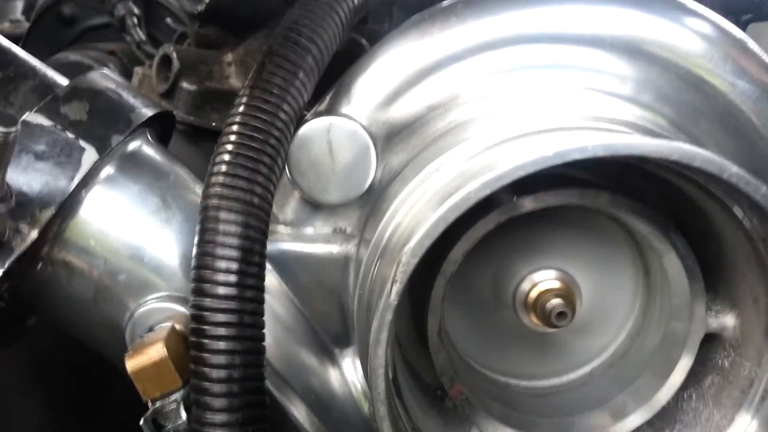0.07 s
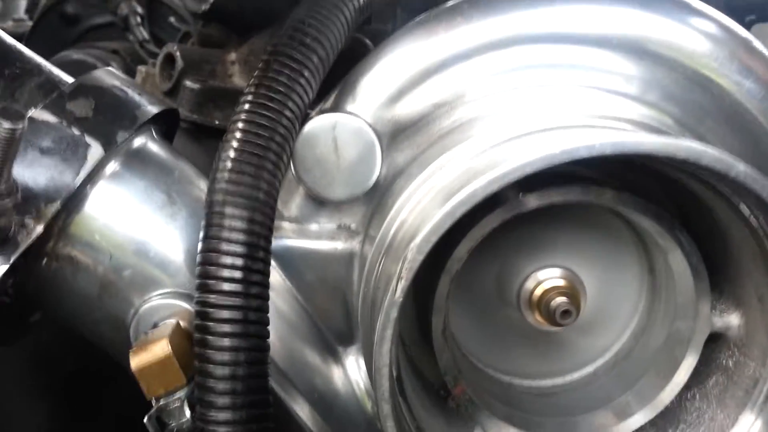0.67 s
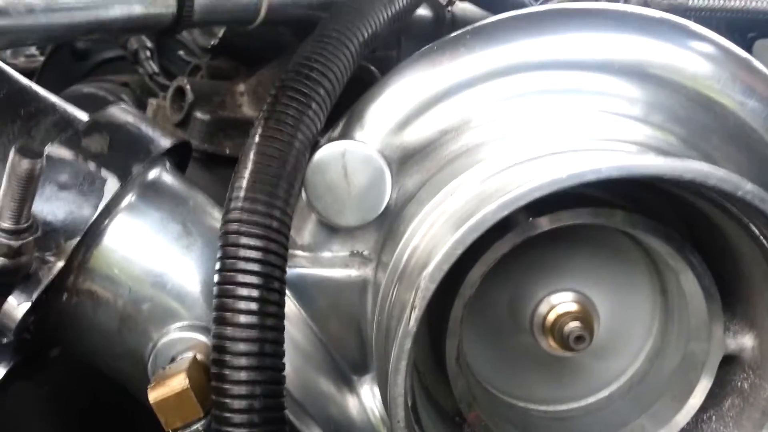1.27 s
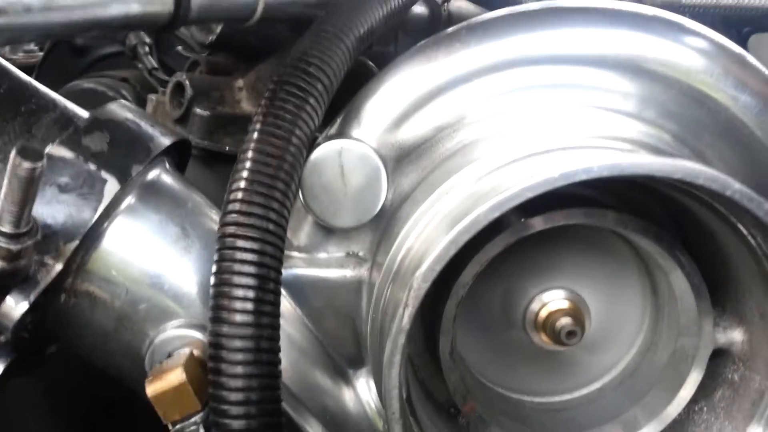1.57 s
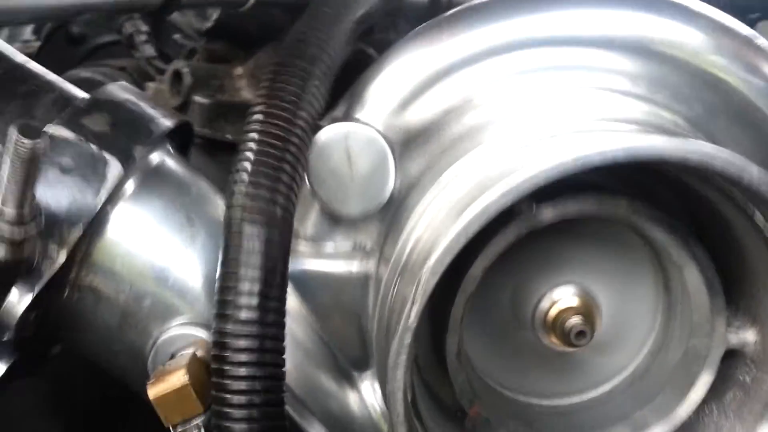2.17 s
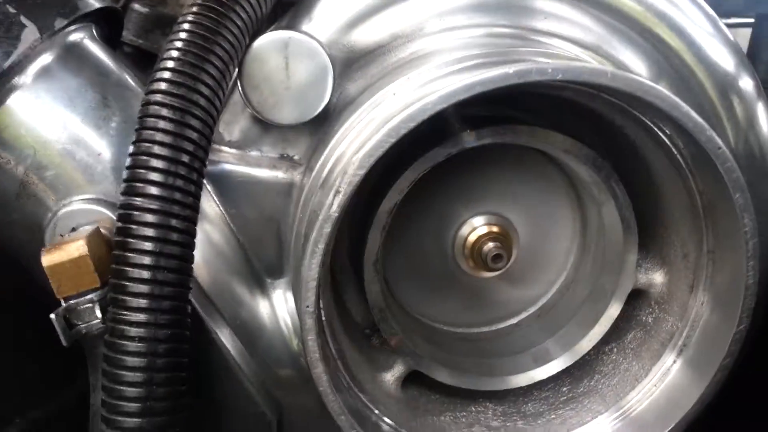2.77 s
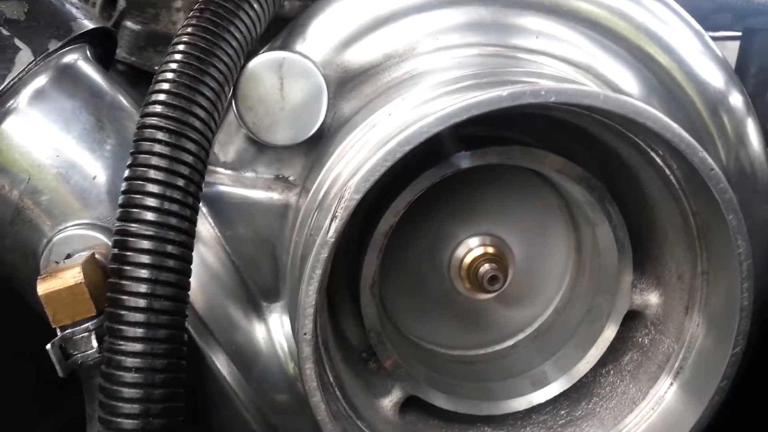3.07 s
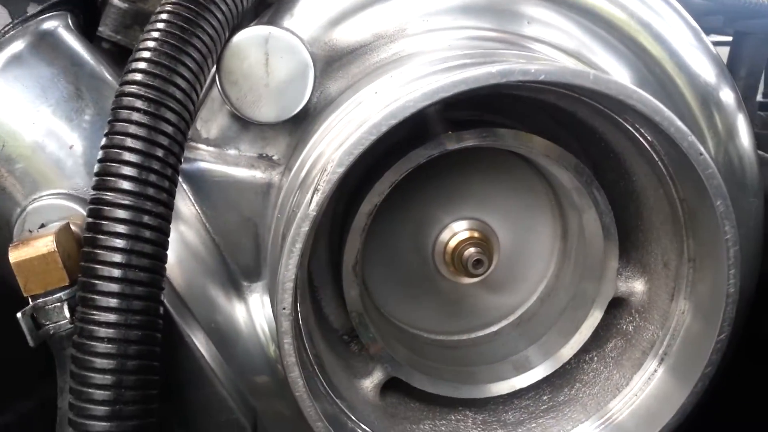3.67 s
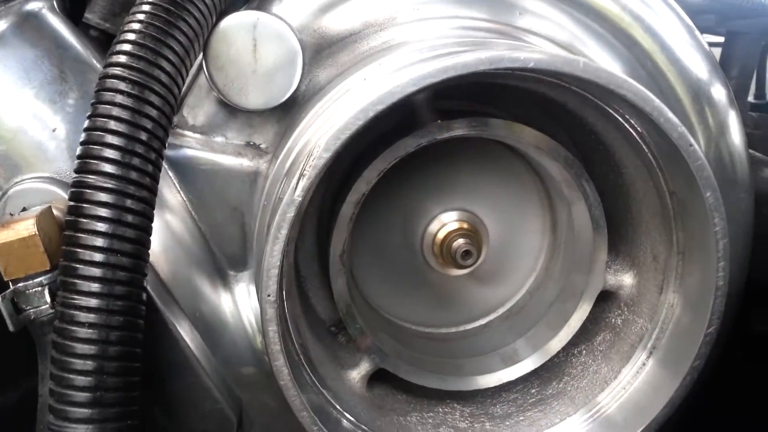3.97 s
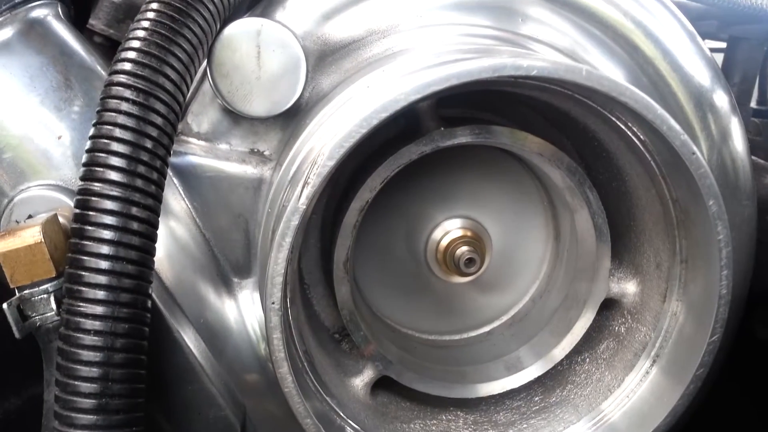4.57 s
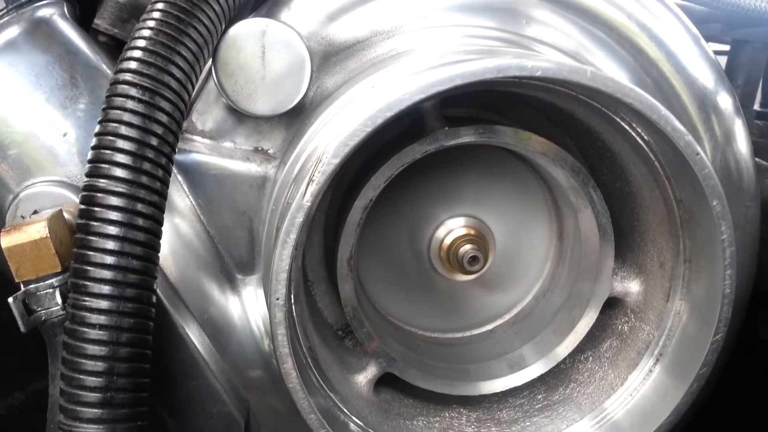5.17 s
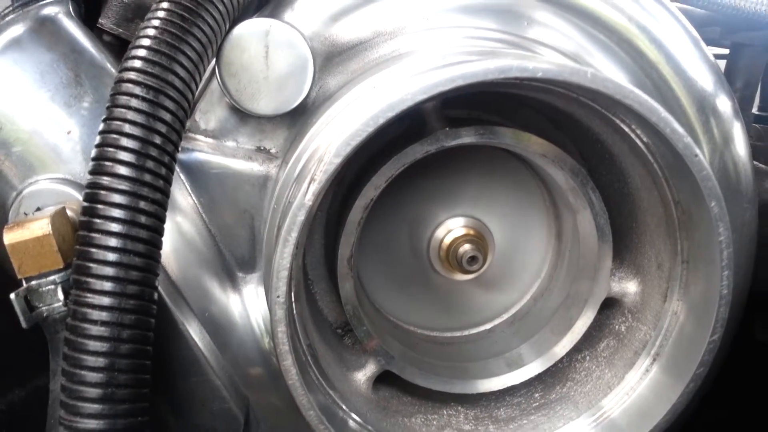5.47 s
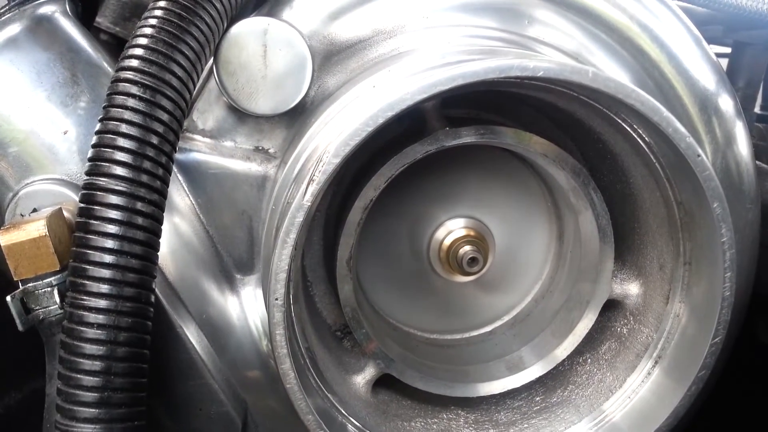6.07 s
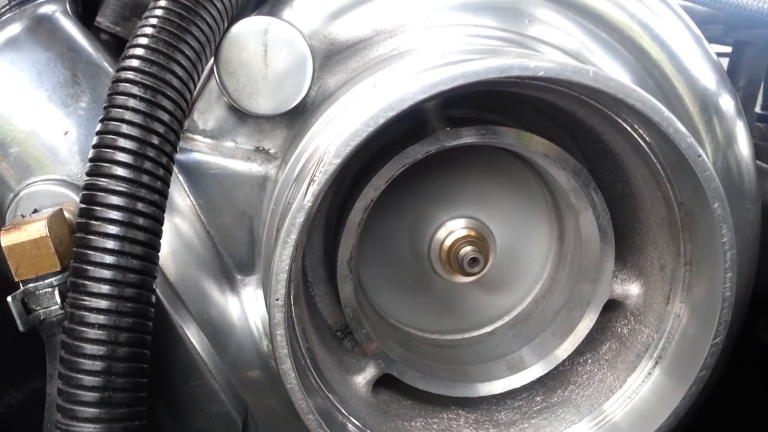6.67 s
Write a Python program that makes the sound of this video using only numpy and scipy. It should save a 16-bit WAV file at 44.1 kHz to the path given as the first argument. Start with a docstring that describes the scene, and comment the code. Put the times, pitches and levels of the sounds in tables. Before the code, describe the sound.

Close to an open turbocharger inlet, a knocking diesel engine stops, chuffs three times, and the wheel spins down with a pulsing hiss.

```python
"""A six-cylinder diesel idles, heard at its turbocharger's open inlet; each firing rings the block.
At 1.8 s the fuel is cut: the knocks slow and die, the inlet hiss comes up with the recorder's gain,
and the belt squeaks as the crank stops. From 2.4 s air surges back through the compressor in three
chuffs. The wheel coasts on with a pulsing, fading hiss that rings in the inlet throat, while
spilling air buffets the right microphone port."""
import sys
import numpy as np
from scipy import signal
from scipy.fft import rfft, irfft, next_fast_len
from scipy.io import wavfile
from scipy.ndimage import uniform_filter1d

SR = 44100
rng = np.random.default_rng(int(sys.argv[2]) if len(sys.argv) > 2 else 0)


def dump_mix(stems):
    """Bounce the given channels to the path in sys.argv[1] as a 16-bit WAV at rate SR."""
    frames = np.atleast_2d(stems).T  # one column per channel
    limited = np.clip(frames, -1, 1)  # hard clip at full scale
    pcm = np.round(limited * 32767).astype(np.int16)
    wavfile.write(sys.argv[1], SR, pcm)


N = 305613
T, HZ = np.arange(N) / SR, np.fft.rfftfreq(next_fast_len(N), 1 / SR)
IDLE_FIRING_HZ = 38.45
SHUTOFF_S, LAST_STROKE_S, COAST_FROM_S, FADE_FROM_S = 1.817, 2.363, 2.6, 3.378


# engine hum: firing_multiple, level_db
HUM_ORDERS = [(2, -34.5), (3, -33), (12, -17.5)]
# hollow ring of unfired strokes: centre_hz, width_hz, lift_db
STALL_MODES = [(595, 79, 6), (1370, 80, -8), (2180, 360, 4.5)]

def engine(brake_hz_per_s=47.3, idle_db=-6.5, stop_db_per_s=138, boom_hz=150):
    """The diesel fires steadily until shut-off; friction then slows it at a constant pace."""
    firing_hz = np.maximum(IDLE_FIRING_HZ - brake_hz_per_s * after(SHUTOFF_S), 0)
    strokes, speed = np.cumsum(firing_hz) / SR, firing_hz / IDLE_FIRING_HZ
    times = .008 + np.interp(np.arange(int(strokes[-1]) + 1), strokes, T)
    firing = knocks(times, speed) + pings(times)
    stalling = colour(firing, amp(lifts(STALL_MODES)) * (1 - below(boom_hz)))
    hum = sum(np.sqrt(2) * amp(db) * np.sin(2 * np.pi * (order * strokes + rng.random()))
              for order, db in HUM_ORDERS)
    fuel = np.clip(speed, 0, 1) ** 7  # hum and boom die first
    level_db = idle_db - stop_db_per_s * after(LAST_STROKE_S)
    return amp(level_db) * (fuel * (firing + hum) + (1 - fuel) * stalling)


# block spectrum: freq_hz, density_db
BLOCK_SPECTRUM = [(24, -54), (40, -29), (115, -21), (228, -18.5), (291, -10.5), (337, -9.5), (453, -9.5),
                  (593, -1.5), (1070, -0.5), (1700, -3), (2250, -6.5), (2780, -7.5), (9460, -23),
                  (14000, -33)]
# cover and pipe resonances: centre_hz, width_hz, lift_db
COVER_MODES = [(300, 17, 6), (432, 65, 12), (560, 25, 6), (610, 170, -8), (782, 35, 4), (925, 35, 4),
               (1090, 35, 5), (1237, 35, 4), (1443, 40, 4), (1530, 70, -4), (1598, 25, 4), (1740, 110, -4),
               (1846, 45, 4), (2040, 45, 3), (2146, 100, -3), (2848, 25, 6)]
# engine likeness between ports: freq_hz, correlation
ENGINE_LIKENESS = [(60, 0.46), (150, 0.91), (350, 0.89), (700, 0.29), (1200, 0.077), (2500, 0.027)]
# engine balance: freq_hz, left_minus_right_db
ENGINE_BALANCE = [(100, 0), (450, 2), (950, 4), (1090, -7), (1180, -1.5), (4000, 2.5), (7000, -2.5),
                  (11000, -7)]

def knocks(times, speed, thud_delay_s=.012, thud_hz=620, crack_hz=3300):
    """Combustion knocks ring the block; a duller thud follows each, and gear whirr fills the gaps."""
    low, high = below(thud_hz), 1 - below(crack_hz)
    whirr_share = (.47 + .33 * high) ** 2
    blow_share = 1 - whirr_share
    knock = blows(times, rise_s=.0012, decay_s=.013, rattle=.08)
    crack = blows(times, rise_s=.00087, decay_s=.0052, rattle=.25)
    thud = blows(times + thud_delay_s, rise_s=.00089, decay_s=.031, rattle=.12)
    thud_db = 1 + 7 * (1 - speed)  # heavier towards standstill
    drive = colour(knock, np.sqrt((1 - low) * (1 - high) * blow_share))
    drive += colour(crack, np.sqrt(high * blow_share))
    drive += colour(thud, np.sqrt(low * blow_share)) * amp(thud_db)
    drive += speed * colour(gears(), np.sqrt(whirr_share))
    return ports(drive, curve(BLOCK_SPECTRUM) + lifts(COVER_MODES), ENGINE_LIKENESS, ENGINE_BALANCE)


# knock strength per cylinder, in firing order: level_db
CYLINDER_DB = [.5, -2, 0, .5, -1.5, -.5]

def blows(times, rise_s, decay_s, rattle, rattle_s=.14):
    """One noise burst a firing; each cylinder's own clatter partly recurs every cycle."""
    t = np.arange(SR // 8) / SR
    shape = (1 - np.exp(-t / rise_s)) ** 2 * (np.exp(-t / decay_s) + rattle * np.exp(-t / rattle_s))
    clatter = rng.standard_normal((len(CYLINDER_DB), 2, len(t)))
    alike, fresh = np.zeros((2, 2, N))
    for k, start_s in enumerate(times):
        cylinder = k % len(CYLINDER_DB)
        burst = shape * amp(CYLINDER_DB[cylinder] + rng.standard_normal())
        add(alike, start_s, burst * clatter[cylinder])
        add(fresh, start_s, burst * rng.standard_normal((2, len(t))))
    both = recurring(alike, fresh)
    return both / both[:, :SR].std()


# sound repeated every engine cycle: freq_hz, power_share
CYCLE_SHARE = [(500, .8), (1200, .72), (2000, .45), (4000, .15)]

def recurring(alike, fresh):
    """Blends sound that repeats every engine cycle with sound that is new each time."""
    share = np.clip(curve(CYCLE_SHARE), 0, 1)
    return colour(alike, np.sqrt(share)) + colour(fresh, np.sqrt(1 - share))


# metal patches rung by each cylinder: firing_slot, pitch_hz, level_db, ring_s
METAL_RINGS = [(0, 2440, -7, .009), (0, 4250, -8, .0035), (1, 1846, -4, .009), (1, 1362, -8, .008),
               (2, 835, -2.5, .010), (3, 1400, -2, .006), (3, 2040, -3, .007), (4, 1093, -5, .007),
               (5, 2440, -6, .007), (5, 1362, -6, .011), (5, 4400, -8, .005)]

def pings(times, gain_db=1.5, detune=.008, scatter_db=.7):
    """Each firing rings its own patches of metal, never quite alike; a valve clicks shut after it."""
    valve_delay_s, valve_hz, valve_db, valve_ring_s = .0155, 4750, -12, .004
    t, out = np.arange(SR // 20) / SR, np.zeros((2, N))
    for k, firing_s in enumerate(times):
        rings = [(firing_s, hz, gain_db + db, ring_s)
                 for slot, hz, db, ring_s in METAL_RINGS if slot == k % len(CYLINDER_DB)]
        rings.append((firing_s + valve_delay_s, valve_hz, valve_db, valve_ring_s))
        for start_s, hz, db, ring_s in rings:
            shape = 2 * t / ring_s * np.exp(1 - 2 * t / ring_s)
            cycles = hz * (1 + detune * rng.standard_normal((2, 1))) * t + rng.random((2, 1))
            gain = amp(db + scatter_db * rng.standard_normal())
            add(out, start_s, gain * shape * np.sin(2 * np.pi * cycles))
    return out


def gears():
    """Gear-train whirr, partly repeating with every idle cycle."""
    period = round(len(CYLINDER_DB) / IDLE_FIRING_HZ * SR)
    return recurring(noise()[:, np.arange(N) % period], noise())


def turbo(start_hz=64.75, drag_s=2.32, drag_power=1.3):
    """Air drag slows the coasting compressor wheel by a power law; it hisses, rushes and swishes."""
    wheel_hz = start_hz / (1 + after(COAST_FROM_S) / drag_s) ** drag_power
    turns = np.cumsum(wheel_hz) / SR
    return hiss(wheel_hz, turns) + rush(wheel_hz) + swish(turns)


# inlet hiss spectrum: freq_hz, density_db
HISS_SPECTRUM = [(40, -55), (500, -14), (1200, -5.5), (1600, -18.5), (2050, -12.5), (2400, -7.5),
                 (3000, -3), (4200, -8), (6200, -10), (7000, -14), (10000, -15.5), (14000, -26.5)]

def hiss(wheel_hz, turns, end_depth=.25, end_phase_turns=.32, treble_hz=4300, dull_db_per_s=2.5):
    """The wheel hisses through the throat, louder once a turn, and dulls as it fades."""
    air = inlet_noise(HISS_SPECTRUM)
    treble = colour(air, 1 - below(treble_hz))
    dulled = air + (amp(-dull_db_per_s * after(FADE_FROM_S)) - 1) * treble
    depth = end_depth * wheel_hz[-1] / wheel_hz  # slow turns stand out more
    throb = 1 + depth * np.cos(2 * np.pi * (turns - turns[-1] + end_phase_turns))
    return hiss_level() * throb * dulled


def hiss_level(level_db=-15.5, fade_db_per_s=7.5):
    """Envelope of the hiss: the inlet's loudness, then a steady fade as the wheel coasts."""
    return inlet_loudness() * amp(level_db - fade_db_per_s * after(FADE_FROM_S))


# air modes of the inlet throat: centre_hz, width_hz, lift_db
THROAT_MODES = [(438, 50, 8), (750, 70, -7), (890, 160, 3), (1240, 70, 5), (1590, 50, 3), (2020, 200, -2),
                (2395, 130, 8), (2930, 280, 4.5), (3170, 160, 3.5), (3520, 160, -3), (3730, 170, 7),
                (4480, 130, 6), (5410, 180, 6), (6330, 220, 6), (7910, 110, 4)]
# inlet likeness between ports: freq_hz, correlation
INLET_LIKENESS = [(80, 0.78), (400, 0.94), (900, 0.45), (2500, 0.015)]
# inlet balance: freq_hz, left_minus_right_db
INLET_BALANCE = [(100, -12), (400, -4), (1200, 1), (2300, -3), (3000, -2.5), (4100, 2), (6000, -4),
                 (8000, -8), (13000, -14.5)]

def inlet_noise(spectrum, throat_share=1):
    """Air noise ringing in the inlet throat."""
    spectrum_db = curve(spectrum) + throat_share * lifts(THROAT_MODES)
    return ports(noise(), spectrum_db, INLET_LIKENESS, INLET_BALANCE)


# chuff spectrum: freq_hz, density_db
CHUFF_SPECTRUM = [(40, -25), (150, -33), (350, 2), (700, 1.5), (1200, 5.5), (1650, 3), (2000, -4),
                  (3200, 1), (6500, -2.5), (9500, -9), (14000, -17)]

def chuffs(rasp=.12, rasp_hz=100):
    """Broad, rasping gusts as the last strokes push air back out of the inlet."""
    flow = surge_flow() * (1 + rasp * flutter(rasp_hz))
    return flow * inlet_noise(CHUFF_SPECTRUM, throat_share=.8)


# back-surges through the compressor, overlapping into three chuffs: start_s, length_s, level_db
SURGES = [(2.402, .045, -9), (2.435, .11, -7), (2.621, .138, -6.5), (2.872, .04, -8.5), (2.905, .085, -11)]

def surge_flow(taper=.55, leak=.16, leak_s=.07):
    """Gust strength: each surge rises, holds and drops, with a weaker leak before and after."""
    flow = np.zeros(N)
    for start_s, length_s, db in SURGES:
        add(flow, start_s, amp(db) * signal.windows.tukey(int(length_s * SR), taper))
        add(flow, start_s - leak_s, leak * amp(db) * np.hanning(int((length_s + 2 * leak_s) * SR)))
    return flow / (1 + leak)


def inlet_loudness(gain_rise_s=.36, sag_db=-1.5):
    """Comes up as the engine quietens and the recorder's automatic gain rises; sags during the chuffs."""
    (first_s, rise_s, _), (last_s, fall_s, _) = SURGES[0], SURGES[-1]
    surging = np.interp(T, [first_s, first_s + rise_s, last_s, last_s + fall_s], [0, 1, 1, 0])
    return np.minimum(after(SHUTOFF_S) / gain_rise_s, 1) * amp(sag_db * surging)


# strongest puffs on the right port: peak_s, level_db, length_s
STRONG_PUFFS = [(2.538, -10, .01), (2.7, -3, 0.00707), (2.735, -10, 0.012), (2.922, -10.5, 0.0049),
                (2.942, -12, 0.0059), (2.968, -7.5, 0.0072), (2.997, -14, 0.0056), (3.038, -19, 0.0058),
                (3.103, -12, 0.0052), (3.128, -8, 0.0062), (3.183, -10.5, 0.0051), (3.241, -14, 0.0046),
                (3.258, -15, 0.0059), (3.285, -13.5, 0.0078), (3.314, -7, 0.0059), (3.364, -2.5, 0.0024),
                (3.424, -7, 0.0031), (3.438, -16, .0062), (3.57, -14, 0.0034), (3.585, -11.5, 0.0044),
                (3.656, -14, 0.005), (3.669, -15, 0.0037), (3.745, -11, 0.004), (3.811, -13.5, 0.006),
                (3.851, -11, 0.0037), (3.864, -9, .006), (3.872, -6.5, 0.0034), (3.929, -7.5, .0033),
                (3.945, -12.5, 0.0047), (4.0, -11.5, 0.0056), (4.076, -15, 0.0069), (4.1, -11.5, 0.0043),
                (4.122, -12, 0.0078), (4.146, -12.5, 0.0047), (4.19, -12, 0.0084), (4.202, -8.5, 0.0046),
                (4.279, -19, 0.014), (4.318, -22, 0.0055), (4.395, -18, 0.0068), (4.522, -25.5, .007),
                (4.605, -10, 0.003), (4.659, -20, 0.0058), (4.738, -17.5, 0.0039), (4.752, -17.5, .0068),
                (4.97, -27, 0.0073), (5.054, -13.5, 0.0026), (5.287, -18, 0.0059), (5.339, -17, 0.0047),
                (5.377, -18.5, .008), (5.979, -20.5, 0.013)]
# puff thump spectrum: freq_hz, density_db
THUMP_SPECTRUM = [(25, -39), (70, -37), (150, -6), (300, 6.5), (550, 1.5), (900, -5.5), (1500, -33),
                  (7000, -49)]
# puff crack spectrum: freq_hz, density_db
CRACK_SPECTRUM = [(300, -30), (650, -1), (1050, 0), (1750, -9), (2400, -28), (7000, -55)]
TYPICAL_PUFF_S = .00514

def buffets(gain_db=1, wake=.094, wake_s=.034, dull_db_per_s=8, low_cut_hz=62):
    """Each puff shoves the right port and leaves a weak wake; short, early puffs crack most."""
    thump = evened(colour(rng.standard_normal(N), amp(curve(THUMP_SPECTRUM))))
    crack = evened(colour(rng.standard_normal(N), amp(curve(CRACK_SPECTRUM))))
    t, out = np.arange(SR // 16) / SR, np.zeros(N)
    for k, (peak_s, db, length_s) in enumerate(STRONG_PUFFS + weak_puffs()):
        doublings = np.log2(length_s / TYPICAL_PUFF_S)
        crack_db = -2.5 - 5.5 * doublings - dull_db_per_s * (peak_s - COAST_FROM_S)
        age = t / length_s
        shape = (age * np.exp(1 - age)) ** 3 + wake * np.exp(-t / wake_s) * np.minimum(age, 1)
        span = (k * len(t) + np.arange(len(t))) % N
        puff = shape * (thump[span] + amp(crack_db) * crack[span])
        puff *= np.linalg.norm(shape) / np.linalg.norm(puff)
        add(out, peak_s - length_s, amp(db + gain_db) * puff)
    return colour(out, 1 - below(low_cut_hz)) * amp([[-20], [2]])  # left, right


def weak_puffs(count=100, crowding=.65, gain_db=-5, scatter_db=1, length_spread=.306):
    """Random puffs, denser and stronger with outflow: in the chuffs, then in the stream after them."""
    gusts, stream = amp(-3) * surge_flow(), hiss_level()
    due = np.cumsum((gusts + stream * (T > SURGES[-1][0])) ** crowding)
    times = np.interp((np.arange(count) + rng.random(count)) / count, due / due[-1], T)
    strength, stretch = rng.standard_normal((count, 2)).T
    flow = np.interp(times, T, lull() * np.maximum(gusts, stream))
    db = 20 * np.log10(flow) + gain_db + scatter_db * strength
    return list(zip(times, db, TYPICAL_PUFF_S * np.exp(length_spread * stretch)))


# low rush spectrum: freq_hz, density_db
RUSH_SPECTRUM = [(30, -40), (60, -28), (100, -9.5), (180, -4.5), (300, -3), (500, -5.5), (800, -4),
                 (1200, -10.5), (1800, -10.5), (4000, -52)]

def rush(wheel_hz, full_db=-19, full_above_hz=55.4, db_per_halving=12):
    """Low rush of inlet air, weakening as the wheel slows."""
    level_db = full_db + db_per_halving * np.minimum(np.log2(wheel_hz / full_above_hz), 0)
    return inlet_loudness() * lull() * amp(level_db) * inlet_noise(RUSH_SPECTRUM)


# dips in the low rush: centre_s, length_s, gain_db
RUSH_DIPS = [(2.82, 0.17, -1), (3.709, .06, -2), (4.495, 0.086, -9)]

def lull():
    """Gain that briefly dips the low rush and the weak puffs."""
    return amp(sum(db * np.exp(-(2 * (T - centre_s) / length_s) ** 2)
                   for centre_s, length_s, db in RUSH_DIPS))


def swish(turns, cycles_per_turn=19.8, width_hz=110, level_db=-25.5, rise_s=.36, fade_db_per_s=5.5):
    """A fuzzy, fluttering blade tone falls with the wheel's speed and wakes the throat's modes."""
    coast_s = after(COAST_FROM_S)
    gain = inlet_loudness() * amp(level_db - fade_db_per_s * coast_s) * np.minimum(coast_s / rise_s, 1)
    gain *= 1 + .5 * flutter(hz=40)
    band = colour(noise(), np.exp(-(HZ / width_hz) ** 2))
    angle = 2 * np.pi * cycles_per_turn * turns
    tone = evened(band[0] * np.cos(angle) + band[1] * np.sin(angle))
    return gain * colour(tone, amp(lifts(THROAT_MODES)))


# belt squeaks: start_s, length_s, pitch_hz, level_db
BELT_SQUEAKS = [(2.245, 0.02, 7100, -13.5), (2.301, 0.024, 6520, -16), (2.407, 0.03, 6000, -8),
                (2.437, 0.027, 7000, -11), (2.44, 0.083, 6020, -15), (2.457, 0.03, 6970, -13),
                (2.565, 0.027, 4050, -16.5)]

def belt(jitter=.02, bend=.02):
    """The belt squeaks as the crank stops: short, unsteady chirps that bend downwards."""
    out = np.zeros(N)
    for start_s, length_s, hz, db in BELT_SQUEAKS:
        size = int(length_s * SR)
        waver = evened(uniform_filter1d(rng.standard_normal(size), size=40))
        pitch_hz = hz * (1 + jitter * waver + np.linspace(bend, -bend, size))
        chirp = np.sin(2 * np.pi * np.cumsum(pitch_hz) / SR)
        add(out, start_s, amp(db) * np.hanning(size) ** 2 * chirp)
    return out * amp([[0], [4]])  # left, right


def ports(x, spectrum_db, likeness, balance):
    """Two unrelated noises become one coloured sound at the two microphone ports; power is kept."""
    shared = np.clip(curve(likeness), -1, 1)
    side = amp(curve(balance) / 2)
    gain = evened(amp(spectrum_db)) / np.sqrt((side ** 2 + side ** -2) / 2)
    right = colour(x[0], gain * shared / side) + colour(x[1], gain * np.sqrt(1 - shared ** 2) / side)
    return np.array([colour(x[0], gain * side), right])


def colour(x, gain):
    """Filters by a gain for each frequency."""
    size = next_fast_len(N)
    return irfft(rfft(x, size) * gain, size)[..., :N]


def curve(points):
    """Interpolates a table over log frequency."""
    hz, value = np.transpose(points)
    return np.interp(np.log(HZ + 1), np.log(hz), value)


def lifts(modes):
    """Bell-shaped resonances, in dB."""
    return sum(db / (1 + (2 * (HZ - hz) / width_hz) ** 2) for hz, width_hz, db in modes)


def below(hz):
    """Gain of a steep low-pass."""
    return 1 / (1 + (HZ / hz) ** 8)


def noise():
    """White noise for each port."""
    return rng.standard_normal((2, N))


def flutter(hz):
    """Random wobble of rms 1, up to the given rate."""
    return evened(colour(rng.standard_normal(N), below(hz)))


def amp(db):
    """Decibels to gain."""
    return 10 ** (np.asarray(db) / 20)


def evened(x):
    """Scales to rms 1."""
    return x / np.sqrt(np.mean(x ** 2) + 1e-20)


def after(start_s):
    """Seconds since start_s; zero before it."""
    return np.maximum(T - start_s, 0)


def add(mix, start_s, sound):
    """Mixes a sound in at start_s."""
    part = mix[..., max(round(start_s * SR), 0):][..., :sound.shape[-1]]
    part += sound[..., :part.shape[-1]]


def scene():
    """Engine, turbocharger, belt and air on the microphone."""
    return engine() + turbo() + chuffs() + belt() + buffets()


def record(dry, knee=7, cutoff_hz=14540):
    """Rounds off the loudest peaks, then low-passes."""
    clipped = dry / (1 + abs(dry) ** knee) ** (1 / knee)
    low_pass = signal.firwin(511, cutoff_hz, window=("kaiser", 9), fs=SR)
    return signal.oaconvolve(clipped, low_pass[None], "same")


dry = scene()
out = record(dry)
dump_mix(out)
```